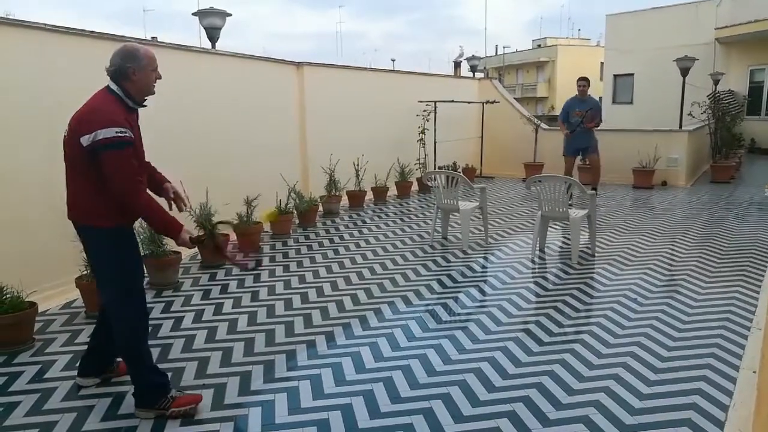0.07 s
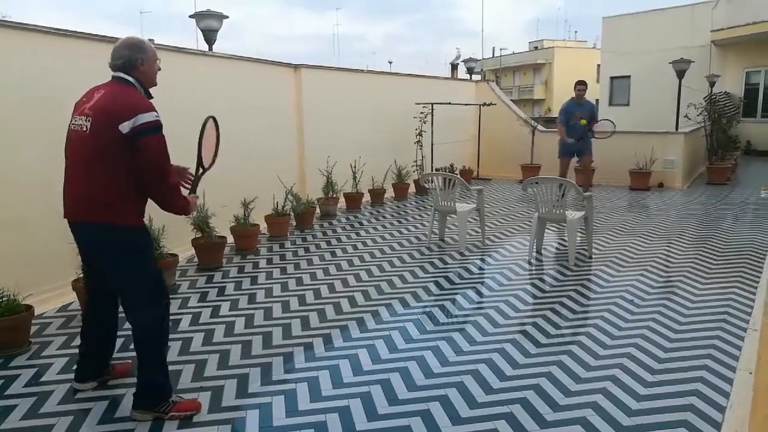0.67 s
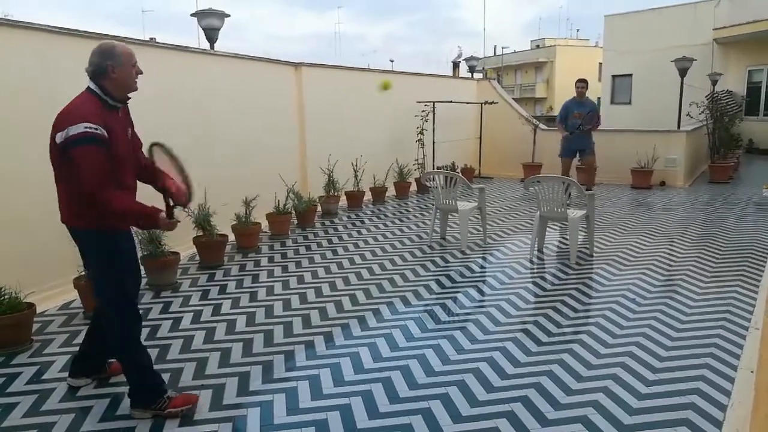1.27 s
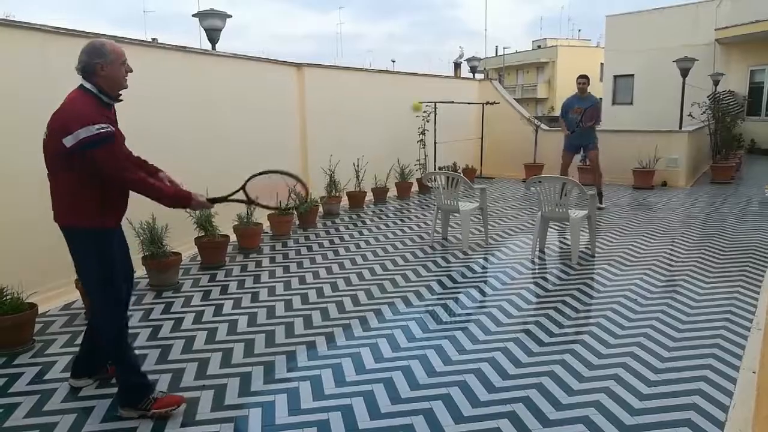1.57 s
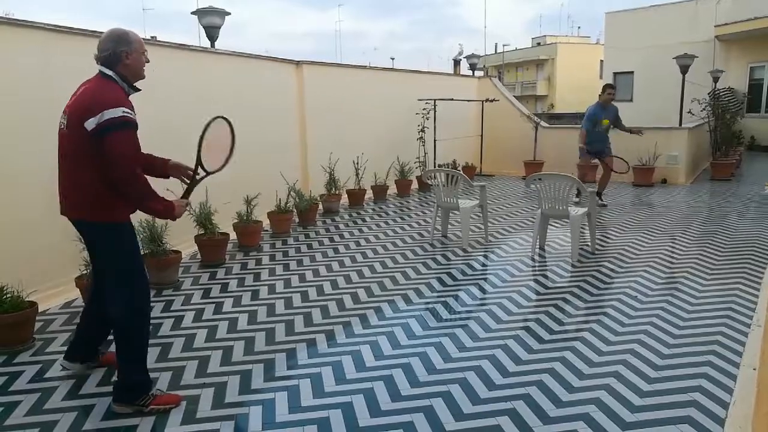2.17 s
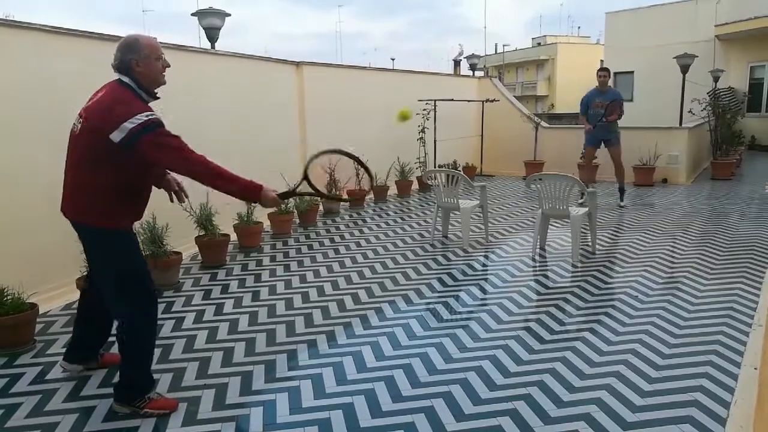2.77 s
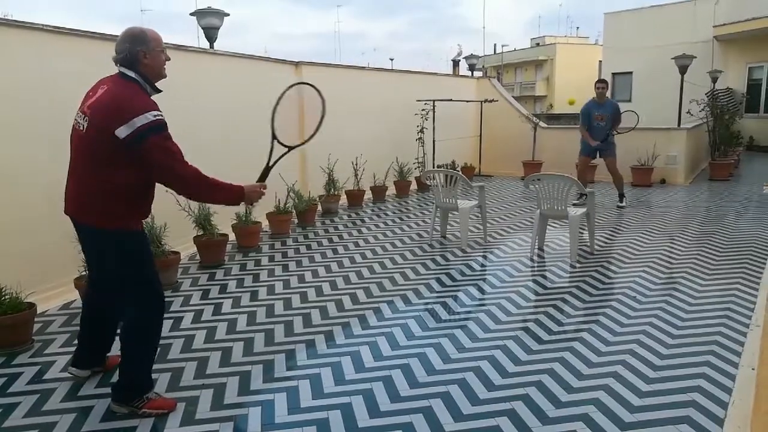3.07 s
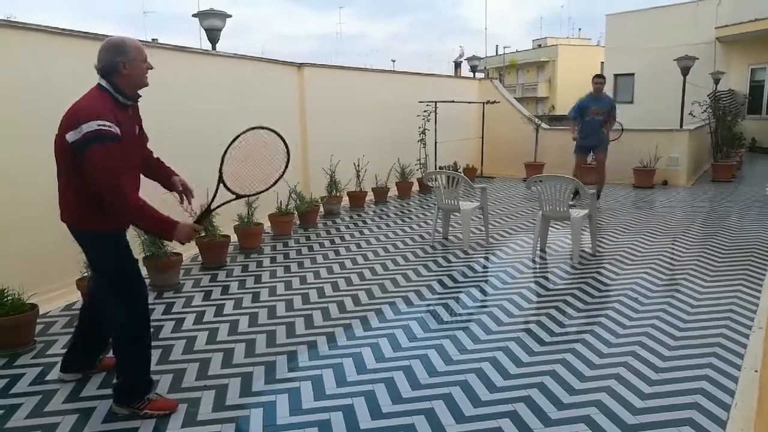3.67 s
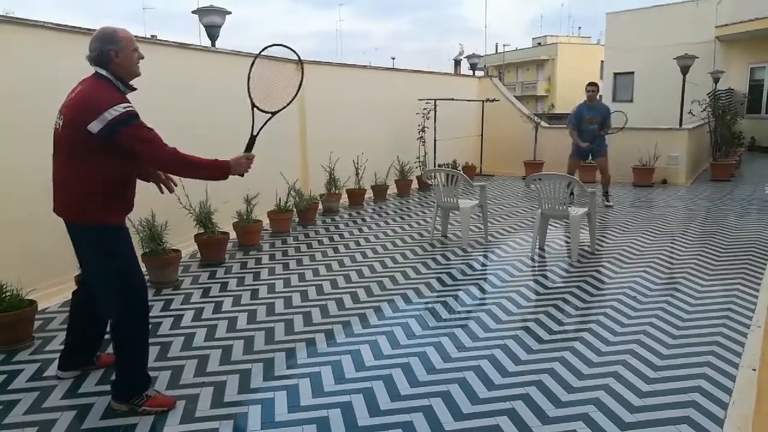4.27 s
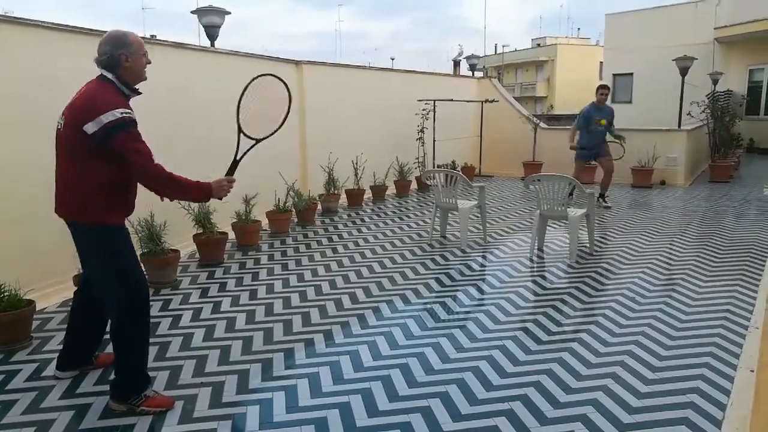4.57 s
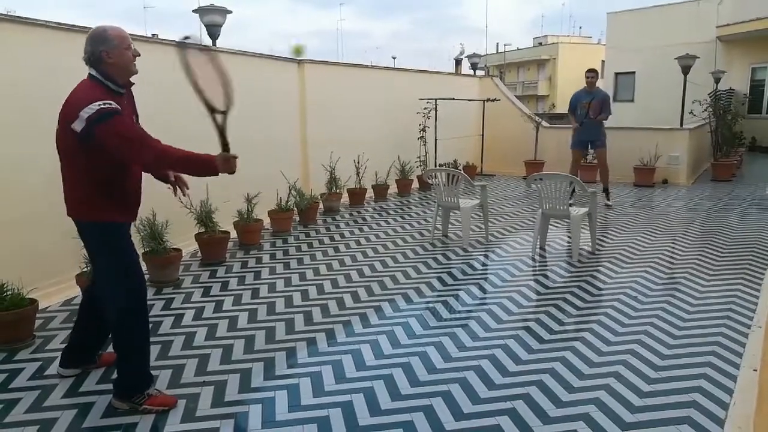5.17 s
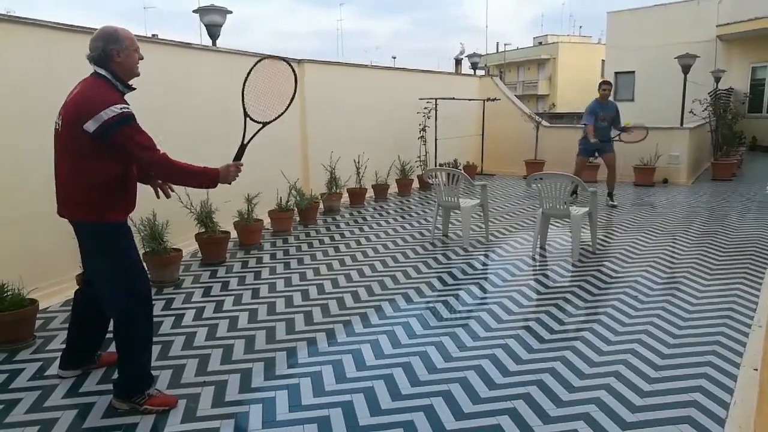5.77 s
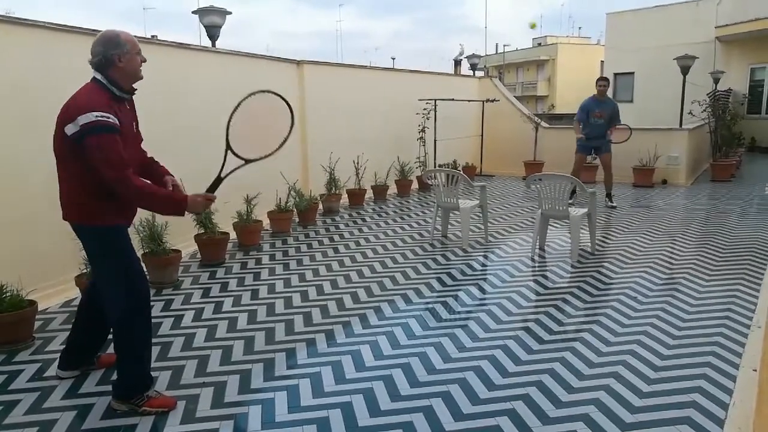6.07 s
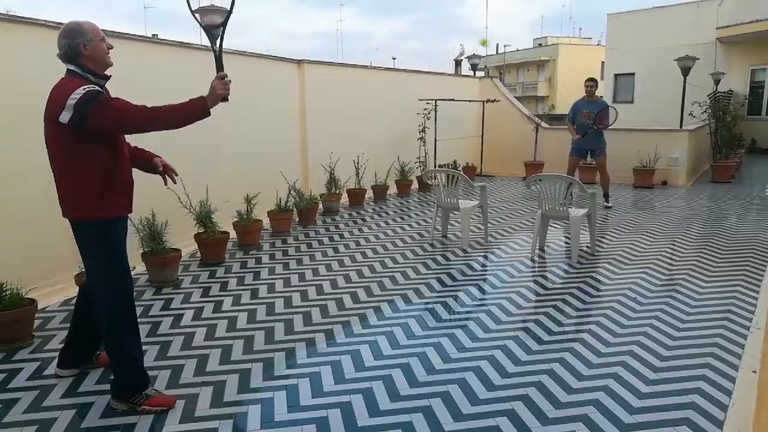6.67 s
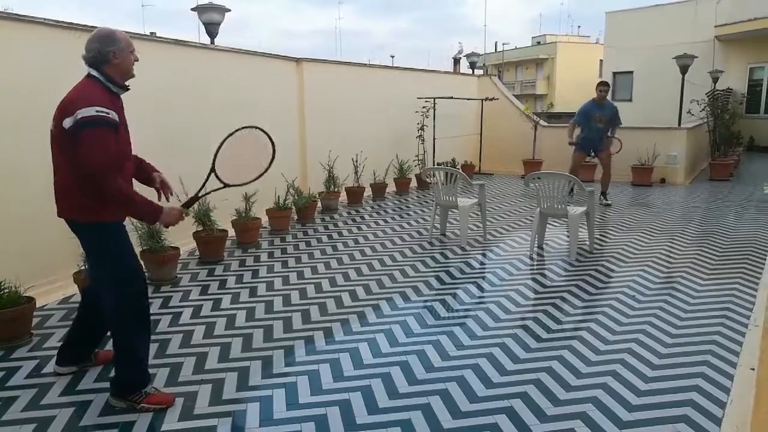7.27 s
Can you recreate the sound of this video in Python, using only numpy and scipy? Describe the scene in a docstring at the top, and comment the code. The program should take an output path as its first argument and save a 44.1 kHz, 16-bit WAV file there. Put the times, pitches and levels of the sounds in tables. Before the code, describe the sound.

A tennis ball is volleyed back and forth on a walled terrace, sharp close racket hits alternating with softer distant ones.

```python
"""Thump, crack and a short ping of strings: a tennis ball is volleyed on a tiled, walled roof terrace.
Each impact, close by or at the far end, excites the resonances of ball and racket; the walls return
it as reverberation, flutter echo and standing waves. The players step in and swish a sleeve, a soft
low rumble follows each stroke, and the near swing wafts air at the microphone.
Under it all lies the faint wash of the town."""
import sys
import numpy as np
from scipy import signal
from scipy.fft import rfft, irfft, next_fast_len
from scipy.io import wavfile
from scipy.ndimage import uniform_filter1d

SR = 44100
rng = np.random.default_rng(int(sys.argv[2]) if len(sys.argv) > 2 else 0)


def wav_record(signal):
    """Record a signal, one row per channel, as 16-bit PCM in the file named by sys.argv[1]."""
    frames = np.transpose(np.atleast_2d(signal))
    bounded = np.clip(frames, -1, 1)
    # unit amplitude maps onto the largest positive 16-bit level
    quanta = np.round(bounded * 32767).astype(np.int16)
    wavfile.write(sys.argv[1], SR, quanta)


N = 322371
HZ = np.fft.rfftfreq(8192, 1 / SR)  # frequency grid of the filter curves
T = np.arange(SR) / SR  # one second


def amp(db):
    """Amplitude ratio of a level in decibels."""
    return 10 ** (np.asarray(db) / 20)


def unit(x):
    """Normalisation to a mean energy of 1 per channel."""
    return x / np.sqrt(np.mean(np.sum(x ** 2, -1)) + 1e-20)


def curve(points, hz=HZ):
    """Interpolation on a logarithmic frequency axis."""
    knots_hz, values = np.transpose(points)
    return np.interp(np.log(hz + 1), np.log(knots_hz + 1), values)


def add(mix, start_s, sound):
    """Superposition: a stereo sound joins the mix at start_s."""
    part = mix[:, round(start_s * SR):][:, :sound.shape[1]]
    part += sound[:, :part.shape[1]]


def convolve(x, response):
    """Causal convolution, cut to the length of x."""
    return signal.fftconvolve(x, np.atleast_2d(response), axes=1)[:, :x.shape[1]]


def colour(x, gain_db):
    """Minimum-phase filter: the phase follows from the Hilbert transform of the log gain."""
    log_gain = np.log(amp(np.r_[gain_db, gain_db[-2:0:-1]]))
    response = np.fft.ifft(np.exp(np.conj(signal.hilbert(log_gain)))).real
    return convolve(x, response[:len(HZ)])


def whiten(x, bins):
    """Inverse filtering flattens the broad spectrum of a burst and keeps its fine structure."""
    power = signal.welch(np.pad(x, ((0, 0), (4096, 0))), nperseg=8192, detrend=False)[1].mean(0)
    smoothed = uniform_filter1d(power / power.mean(), bins)
    return unit(colour(x, -10 * np.log10(smoothed + 1e-6)))


def bell(hz, width_hz):
    """Lorentzian curve of height 1."""
    return 1 / (1 + (2 * (HZ - hz) / width_hz) ** 2)


def resonance(hz, width_hz, peak_db):
    """Gain in dB of a resonance that stands peak_db above its surroundings."""
    return 10 * np.log10(1 + (amp(peak_db) ** 2 - 1) * bell(hz, width_hz) ** 2)


def noise_pair(coherence, size):
    """Partial coherence: the balance of mid and side noise sets how alike left and right are."""
    mid, side = rfft(rng.standard_normal((2, size)))
    correlation = np.clip(curve(coherence, np.fft.rfftfreq(size, 1 / SR)), -1, 1)
    mid *= np.sqrt((1 + correlation) / 2)
    side *= np.sqrt((1 - correlation) / 2)
    return irfft(np.array([mid + side, mid - side]), size)


# Left-right likeness of scattered sound: frequency_hz, correlation
DIFFUSE_COHERENCE = [(60, 1), (170, 0.99), (330, 0.5), (600, -0.46), (850, -0.29), (1300, 0.11),
                     (2200, -0.0082), (15000, 0.09)]
def wash(spectrum):
    """A diffuse field: coloured noise of rms 1."""
    noise = noise_pair(DIFFUSE_COHERENCE, next_fast_len(N))
    return unit(colour(noise, curve(spectrum))[:, :N]) * np.sqrt(N)


def swells(events, spectrum, flicker_db):
    """Amplitude modulation of noise by flickering Gaussian swells: peak_s, half_width_s, level_db."""
    t = np.arange(N) / SR
    envelope = sum(amp(db) * np.exp(-((t - peak_s) / half_s) ** 2) for peak_s, half_s, db in events)
    noise = wash(spectrum)
    knots_s = t[::400]
    flicker = np.interp(t, knots_s, rng.standard_normal(len(knots_s)))
    return noise * envelope * amp(flicker_db * flicker)


# Spectrum of the town: frequency_hz, level_db
TOWN_SPECTRUM = [(25, -3.5), (60, -6), (150, -5), (300, -11.5), (500, -15.5), (1300, -12), (2500, -17.5),
                 (3900, -14), (6000, -20), (8000, -24.5), (12000, -25), (15500, -25)]
def town(level_db=-66.5, drift_db=0.86):
    """Ambient noise: the town arrives as a diffuse field whose level wanders slowly."""
    drift = np.interp(np.arange(N), np.linspace(0, N, 40), rng.standard_normal(40))
    return amp(level_db + drift_db * drift) * wash(TOWN_SPECTRUM)


# Spectrum of air flowing over the microphone: frequency_hz, level_db
WIND_SPECTRUM = [(10, -2), (24, -1.5), (45, -16.5), (100, -27.5), (400, -71)]
def wind(breeze_db=-69, puff_after_s=0.32, puff_half_s=0.15):
    """Flow noise: a steady breeze, and a slow, deep puff of air pushed by each near swing."""
    puffs = [(s + puff_after_s, puff_half_s, draught_db) for s, *_, draught_db in NEAR_STROKES]
    return amp(breeze_db) * wash(WIND_SPECTRUM) + swells(puffs, WIND_SPECTRUM, flicker_db=1.0)


# Spectrum shared by the steps and the rumbles: frequency_hz, level_db
LOW_SPECTRUM = [(30, 15.5), (70, -9), (190, 0), (350, -17), (900, -17.5), (3000, -33), (7000, -42)]
def steps_and_rumbles(step_before_s=0.11, step_half_s=0.039, step_db=-69,
                      rumble_after_s=0.27, rumble_half_s=0.09, rumble_offset_db=4.5):
    """Modulated low noise: a soft step leads into each stroke, and a soft rumble swells after it."""
    strokes = [(s, swish_db) for s, *_, swish_db, _ in NEAR_STROKES]
    strokes += [(s, swish_db) for s, *_, swish_db in FAR_STROKES]
    steps = [(s - step_before_s, step_half_s, step_db) for s, _ in strokes]
    rumbles = [(s + rumble_after_s, rumble_half_s, db + rumble_offset_db) for s, db in strokes]
    return swells(steps + rumbles, LOW_SPECTRUM, flicker_db=5.5)


# Spectrum of rubbing: frequency_hz, level_db
SWISH_SPECTRUM = [(500, -14), (2500, -6), (4500, -1.5), (7500, -5.5), (10000, -19), (15000, -23.5)]
# Shoes scuffing the tiles: peak_s, half_width_s, level_db
SHOE_SCUFFS = [(0.893, 0.062, -58.5), (1.333, 0.05, -69), (1.98, 0.064, -66.5), (3.869, .038, -69)]
def swishes(near_after_s=0.2, far_after_s=0.125, half_s=0.063):
    """Friction noise: a sleeve follows each stroke through, and now and then a shoe scuffs."""
    near = [(s + near_after_s, half_s, swish_db) for s, *_, swish_db, _ in NEAR_STROKES]
    far = [(s + far_after_s, half_s, swish_db) for s, *_, swish_db in FAR_STROKES]
    return swells(near + far + SHOE_SCUFFS, SWISH_SPECTRUM, flicker_db=0.5)


# Reverberation time of the terrace: frequency_hz, t60_s
REVERB_TIMES = [(80, 0.64), (200, 0.5), (500, 0.57), (1100, 0.51), (2200, 0.45), (4500, 0.41), (8000, 0.36),
                (14000, 0.25)]
# Spectrum of the reverberation: frequency_hz, level_db
REVERB_SPECTRUM = [(80, 1.5), (170, 0.5), (260, 0), (450, 0), (900, -1.5), (2500, 2.5), (5000, 1),
                   (8000, -4), (14000, -8)]
def reverberation(wall_delay_s, early_db, grain):
    """Scattered echoes decay exponentially, lumpy at first, the treble dying soonest."""
    hz, t, bands = signal.stft(noise_pair(DIFFUSE_COHERENCE, SR), SR, nperseg=256)
    decay = amp(-60 * t / curve(REVERB_TIMES, hz)[:, None])
    tail = signal.istft(bands * decay, SR, nperseg=256)[1][:, :SR]
    lumps = np.interp(T, np.linspace(0, 1, 500), rng.standard_normal(500))
    unevenness = np.exp(grain * lumps * np.exp(-T / 0.28))
    early = 1 / (1 + np.exp(np.minimum((T - wall_delay_s) / 0.00092, 20)))  # 1 until a wall answers
    onset = amp(early_db * early) * (1 - np.exp(-T / 0.0043))
    return colour(whiten(tail * onset * unevenness, bins=30), curve(REVERB_SPECTRUM))


def ring(hz, t60_s):
    """Damped oscillation of one mode, with energy 1."""
    return unit(np.sin(2 * np.pi * hz * T) * amp(-60 * T / t60_s))


# Modes between the walls, excited from either end: pitch_hz, near_db, far_db, t60_s
TERRACE_MODES = [(96.7, -23, -27.5, 0.9), (151, -18, -19, 0.58), (202, -11.5, -12.5, 0.56),
                 (275.5, -20.5, -20, 0.71), (315.7, -14, -12, 0.48)]
def standing_waves(end, detune=0.0064):
    """Room modes ring alike in both channels, at strengths set by the end the stroke comes from."""
    modes = sum(amp(near_db if end == "near" else far_db) * ring(hz * rng.normal(1, detune), t60_s)
                for hz, near_db, far_db, t60_s in TERRACE_MODES)
    return np.array([modes, modes])


def flutter(thump, period_s, reflection):
    """Flutter echo: the thump bounces between the side walls, weaker on each return."""
    taps = np.zeros(SR)
    for bounce in range(9):
        taps[round(bounce * period_s * SR)] = reflection ** bounce
    return convolve(thump[None], taps)


# Left-right likeness of direct sound: frequency_hz, correlation
DIRECT_COHERENCE = [(100, 1), (400, 0.34), (1200, 0.7), (2500, 0), (15000, 0)]
def crack(length_s):
    """A brief contact is broadband: one noise burst stands for the impact and its echo off the tiles."""
    age = T[:4096] / length_s
    burst = noise_pair(DIRECT_COHERENCE, len(age)) * np.sqrt(age) * np.exp(-age ** 3)
    return np.pad(whiten(burst, bins=70), ((0, 0), (0, SR - len(age))))


# Spectrum of the racket's rim: frequency_hz, level_db
RIM_SPECTRUM = [(100, -2), (500, -6.5), (1500, 3), (3000, -4.5), (5000, 2), (8000, -17.5), (15000, -28)]
# The ball clips the rim: start_s, level_db, reverb_to_direct_db
RIM_KNOCKS = [(5.931, -7, 4), (5.9453, -8.5, -1)]
def rim_knocks():
    """Impact on a stiff body: the ball knocks brightly on the rim, and the terrace reverberates."""
    out = np.zeros((2, N))
    for start_s, level_db, reverb_db in RIM_KNOCKS:
        direct = crack(length_s=0.0075)
        echoes = amp(reverb_db) * reverberation(wall_delay_s=0.015, early_db=1.5, grain=0.22)
        add(out, start_s, amp(level_db) * unit(colour(direct + echoes, curve(RIM_SPECTRUM))))
    return out


# Depth of the interference ripple: frequency_hz, depth_fraction
RIPPLE_DEPTH = [(400, 0.05), (1400, 0.13), (2800, 0.68), (14000, 0.83)]
def ripple():
    """Interference: the clicks within one contact cancel at chance frequencies; a gain in dB."""
    clicks = rng.standard_normal(260) * signal.windows.tukey(260, 0.5)
    magnitude = abs(rfft(unit(clicks), 2 * len(HZ) - 2))
    return curve(RIPPLE_DEPTH) * 20 * np.log10(magnitude + 0.033)


def racket(end, strokes, spectrum, modes, direct_spectrum, thump, ping_hz, ping_width_hz, ping_db,
           notch_db, crack_db, crack_s, reverb_db, wall_delay_s, early_db, grain):
    """Source and filter: ball and strings colour a crack and its echoes, over thump and room modes."""
    out = np.zeros((2, N))
    body_db = curve(spectrum) + sum(resonance(*mode) for mode in modes)
    for start_s, level_db, bass_db, middle_db, treble_db, pock_hz, pock_db, notch_hz, *_ in strokes:
        # the spot where the ball meets the strings sets the tone of the stroke
        tone_db = curve([(280, bass_db), (600, middle_db), (1300, middle_db),
                         (2400, 0.0035), (5000, treble_db)])
        tone_db += ripple() * (1 - bell(ping_hz, width_hz=150))  # the ping rings through the dips
        tone_db += resonance(pock_hz, width_hz=112, peak_db=pock_db)
        tone_db += resonance(ping_hz, ping_width_hz, ping_db + 1.45 * level_db)  # harder hits ping more
        tone_db -= notch_db * bell(notch_hz, width_hz=126)
        direct = amp(crack_db) * colour(crack(crack_s), curve(direct_spectrum))
        echoes = amp(reverb_db) * reverberation(wall_delay_s, early_db, grain)
        impact = unit(colour(direct + echoes, body_db + tone_db))
        add(out, start_s, amp(level_db) * (impact + amp(bass_db) * thump))
        add(out, start_s + wall_delay_s, amp(level_db + bass_db) * standing_waves(end))
    return out


# Broad spectrum of a stroke: frequency_hz, level_db
NEAR_SPECTRUM = [(40, -19.5), (90, -3.5), (160, 11.5), (250, 14.5), (450, 0.5), (700, 5.5), (1250, 5),
                 (1650, 1), (2100, -0.5), (3000, -6.5), (4500, -2), (7500, -8), (10500, -18.5),
                 (15500, -22.5)]
FAR_SPECTRUM = [(40, -22), (90, 8), (160, 16), (220, 13.5), (300, 13), (480, -1), (850, 9), (1250, 3),
                (1650, -0.5), (2200, -2.5), (3000, -5), (4300, -5.5), (7500, -10), (10500, -20.5),
                (15500, -32)]
# Extra colour of the direct path from the racket: frequency_hz, gain_db
NEAR_DIRECT_PATH = [(100, -14), (300, 3), (550, 0), (1000, 2.5), (1700, -0.5), (3000, -5.5), (5000, -1),
                    (9000, -2.5), (14000, -6.5)]
FAR_DIRECT_PATH = [(100, 9.5), (300, -6.5), (550, -16.5), (1250, 10), (2200, -17), (3000, -15), (5000, 4.5),
                   (9000, 0), (14000, 1)]
# Resonances of racket and ball: pitch_hz, width_hz, peak_db
NEAR_RESONANCES = [(627, 126, 5), (782, 42, 4), (1307, 45, 3), (2160, 42, 6), (2573, 54, 11), (3180, 60, 6),
                   (3463, 110, 8), (3710, 140, 6), (4190, 480, 0.5), (5110, 320, 4.5)]
FAR_RESONANCES = [(837, 41, 3.5), (2505, 55, 8.6), (3635, 310, 7.2), (4370, 160, 4.9), (4870, 270, 8.5)]
# Strokes of the near player; the pock is the ball's resonance, the notch a weak narrow band:
# start_s, level_db, bass_db, middle_db, treble_db, pock_hz, pock_db, notch_hz, swish_db, draught_db
NEAR_STROKES = [(0.2432, 2.5, -2.5, -0.5, -1, 1144, 8.5, 1510, -63, -56.5),
                (1.5677, 1.6, -0.5, 0, -1, 995, 7.5, 1560, -62, -56),
                (2.8721, 2.5, -3, -2, -4, 1170, 5.5, 1580, -59.5, -58),
                (4.1301, 3.5, -4, -5, -4, 1370, 4, 1835, -76, -56.5),
                (5.3665, 4, -2, -1.5, 0.5, 1036, 7.5, 1790, -71, -49),
                (6.5962, 2.5, -3, -0.5, 3, 980, 0, 1550, -79, -58)]
# Strokes of the far player:
# start_s, level_db, bass_db, middle_db, treble_db, pock_hz, pock_db, notch_hz, swish_db
FAR_STROKES = [(.9060, -1.26, -4.5, -2.2, -2, 1166, 7.5, 510, -82),
               (2.1975, -0.4, 0.6, 0.5, -0.5, 1324, 8, 1600, -58),
               (3.4864, -0.9, 0.5, 0, -1, 1160, 8.7, 480, -65),
               (4.6926, 0.5, -0.2, 0.5, -4.5, 1250, 4, 2450, -85),
               (5.9400, -2, -1.1, -3.5, -2.5, 1170, 8, 3080, -82),
               (7.1838, 2, -1.5, -0.8, 0.2, 614, 7, 2880, -74)]
def rally():
    """The direct-to-reverberant ratio falls with distance: more crack close by, mostly echo far off."""
    near_thump = amp(-10) * flutter(ring(hz=244, t60_s=0.028), period_s=0.019, reflection=0.24)
    far_thump = amp(-16.5) * flutter(ring(hz=213, t60_s=0.072), period_s=0.016, reflection=0.66)
    near = racket("near", NEAR_STROKES, NEAR_SPECTRUM, NEAR_RESONANCES, NEAR_DIRECT_PATH, near_thump,
                  ping_hz=1908, ping_width_hz=55, ping_db=10.1, notch_db=8, crack_db=-4, crack_s=0.0067,
                  reverb_db=-0.3, wall_delay_s=0.00794, early_db=0.5, grain=0.12)
    far = racket("far", FAR_STROKES, FAR_SPECTRUM, FAR_RESONANCES, FAR_DIRECT_PATH, far_thump,
                 ping_hz=1970, ping_width_hz=240, ping_db=6.6, notch_db=10.5, crack_db=-10.5,
                 crack_s=0.0075, reverb_db=-1, wall_delay_s=0.01333, early_db=-7.5, grain=0.057)
    return amp(3.5) * near + amp(0.52) * far


# Level difference between the two microphone ports: frequency_hz, left_minus_right_db
PORT_BALANCE = [(300, 0), (700, 1), (1500, 0), (2200, 2), (3000, 7), (3900, 10), (5000, 2), (6200, -1),
                (7500, -13), (8700, -15), (11000, -15), (15000, -15)]
def scene():
    """Superposition: the play, shorn of deep bass and coloured by each port, lies over town and wind."""
    play = rally() + rim_knocks() + swishes() + steps_and_rumbles()
    play = signal.sosfilt(signal.butter(2, 58, "high", fs=SR, output="sos"), play)
    lean_db = curve(PORT_BALANCE) / 2
    left, right = colour(play[:1], lean_db), colour(play[1:], -lean_db)
    return np.vstack([left, right]) + town() + wind()


def record(dry, cutoff_hz=15750):
    """Band limiting: a steep linear-phase low-pass removes the highest treble."""
    low_pass = signal.firwin(401, cutoff_hz, window=("kaiser", 9), fs=SR)
    return signal.oaconvolve(dry, low_pass[None], "same")


dry = scene()
out = record(dry)
wav_record(out)
```